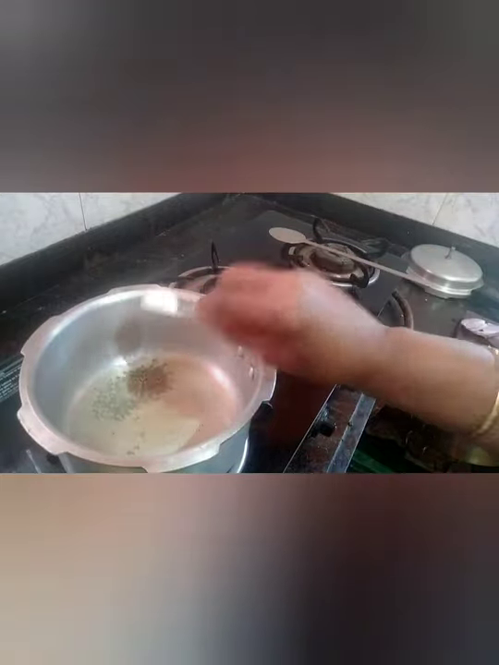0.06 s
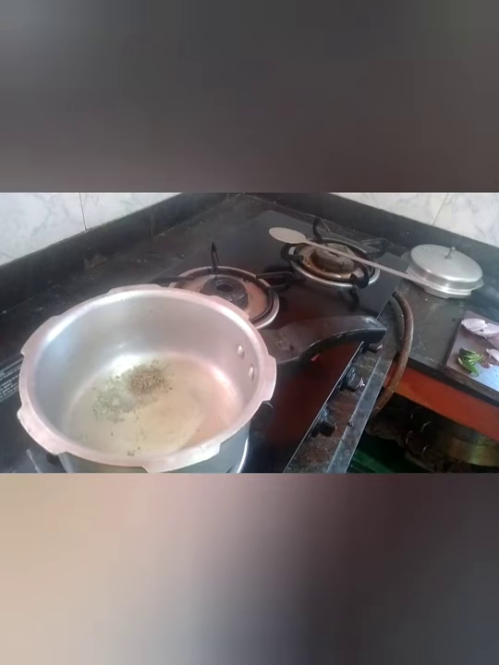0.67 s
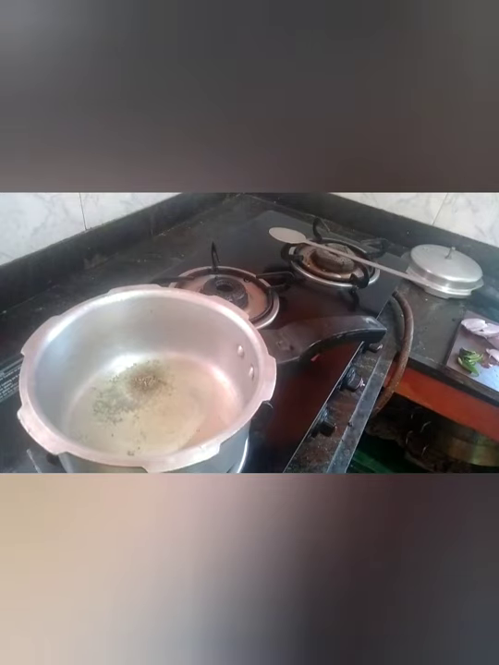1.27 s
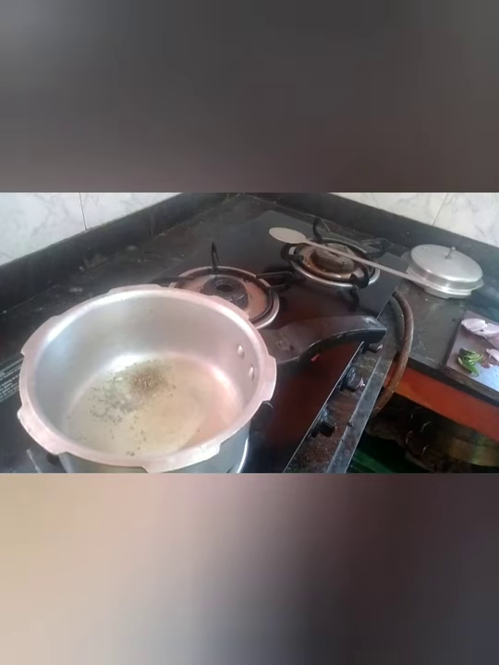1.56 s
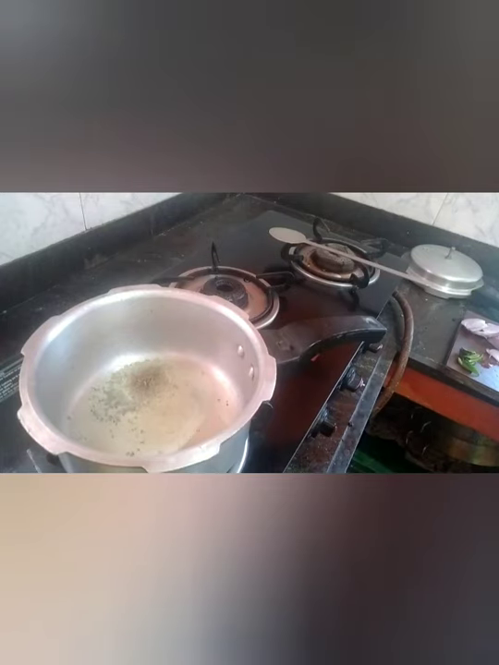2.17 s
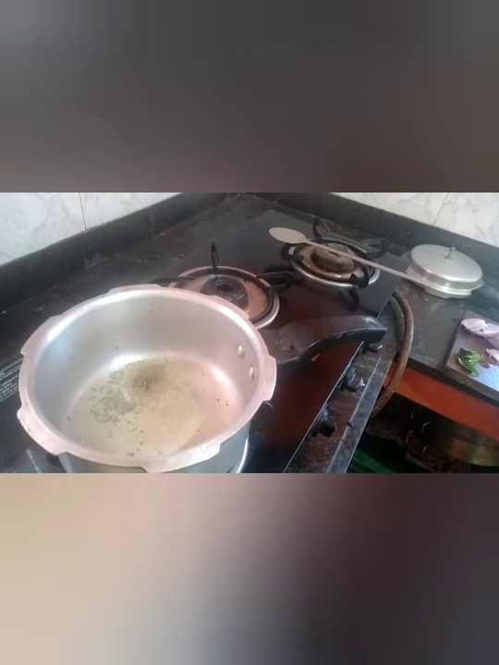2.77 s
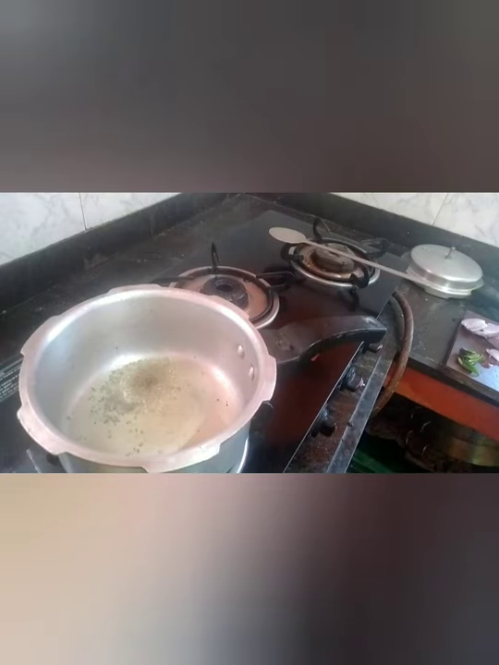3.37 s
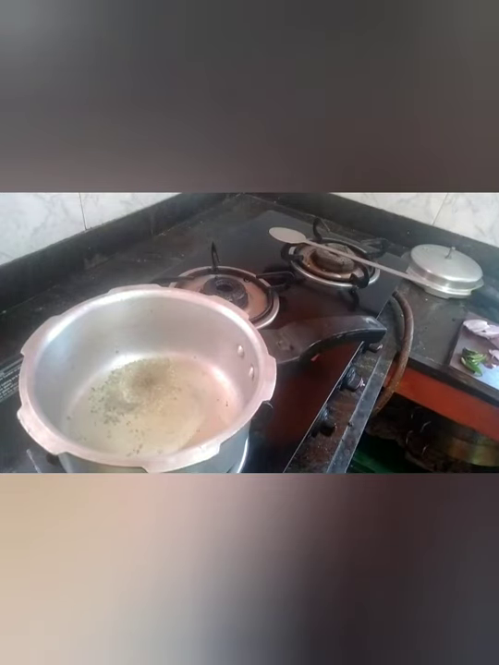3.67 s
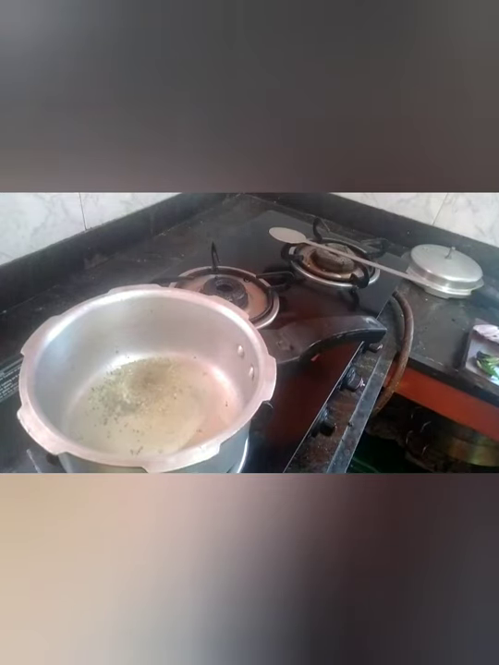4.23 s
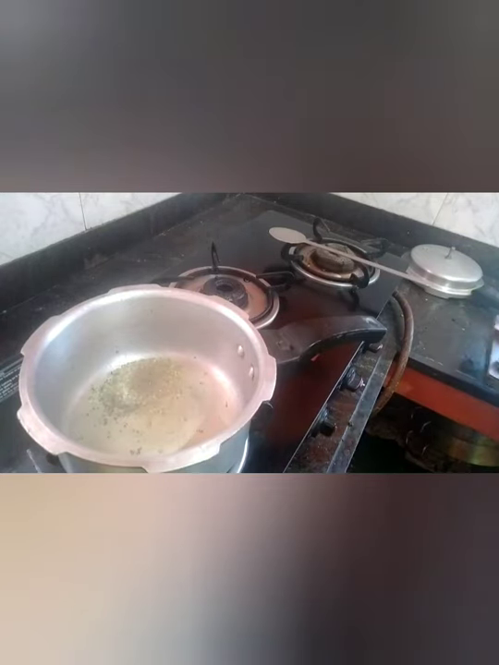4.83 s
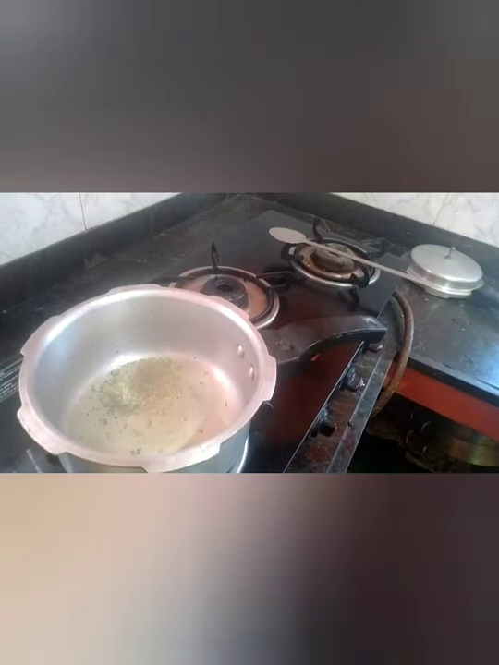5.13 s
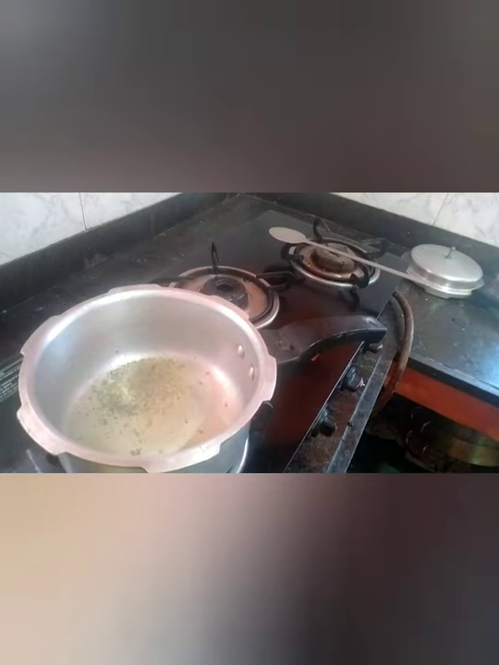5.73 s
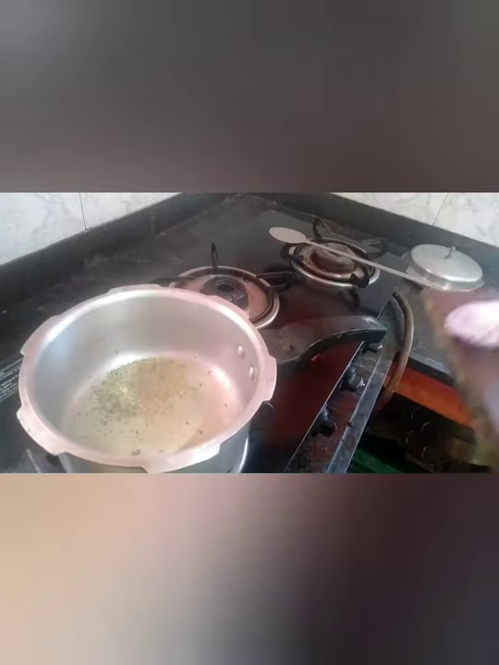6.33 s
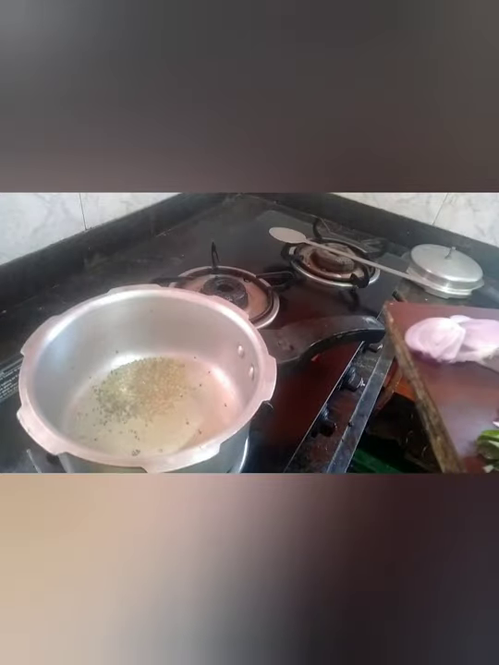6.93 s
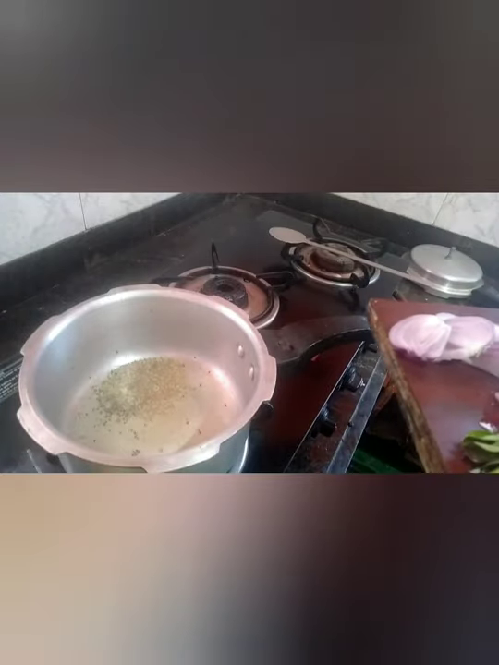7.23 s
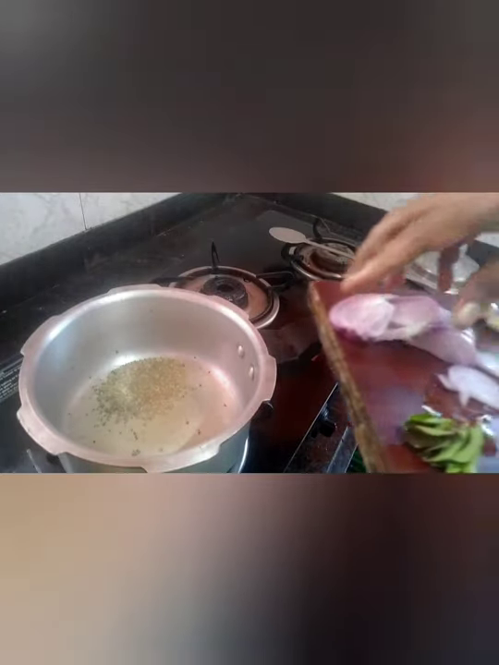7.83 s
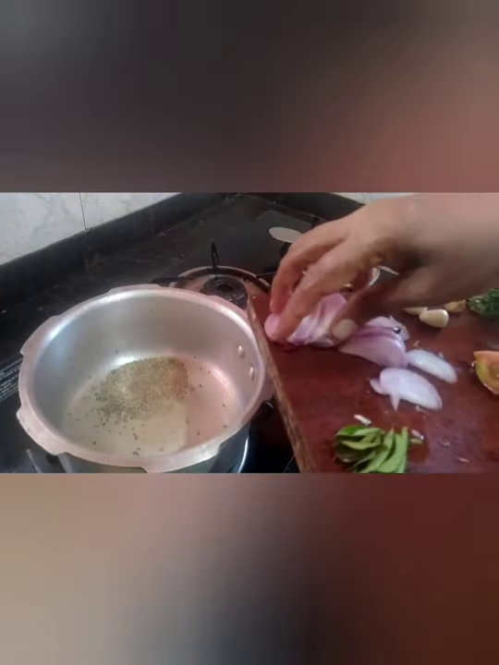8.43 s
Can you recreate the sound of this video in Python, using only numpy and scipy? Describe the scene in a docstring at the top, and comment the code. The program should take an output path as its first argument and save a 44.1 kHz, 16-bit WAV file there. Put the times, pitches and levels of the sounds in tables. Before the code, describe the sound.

Seeds pop in hot oil in an aluminium pot on a kitchen gas stove, heard close in stereo. Sharp, irregular cracks ring lightly on the metal and leave short hisses over a fine, steady sizzle, with small plinks and spits between. Two hollow plops come early on the right. The burner rumbles faintly with a low hum. In the second half, a cutting board slides softly over the counter, with three dull bumps on the left.

```python
"""A kitchen, at the gas stove, with a stereo microphone on an aluminium pot of seeds in hot oil.
Over a fine steady sizzle, each seed pops with a crack, a ringing steam bubble and a knock on the pot,
and leaves a hiss that dies away in the room. Big bubbles plink in between, small ones spit, and the oil
plops on the right. Behind it the burner rumbles, something hums, a cutting board is dragged over the
counter, and three dull bumps sound beside the left microphone."""
import sys
import numpy as np
from scipy import signal
from scipy.fft import rfft, irfft, next_fast_len
from scipy.io import wavfile
from scipy.ndimage import uniform_filter1d, map_coordinates

SR = 44100
rng = np.random.default_rng(int(sys.argv[2]) if len(sys.argv) > 2 else 0)


def master(y):
    """Save y as 16-bit WAV."""
    cut = np.clip(np.atleast_2d(y).T, -1, 1)
    pcm = np.round(cut * 32767)  # scale
    wavfile.write(sys.argv[1], SR, pcm.astype(np.int16))


N = 374693
POP_SIZE = 512  # samples in one short burst
POP_FREQS = np.fft.rfftfreq(POP_SIZE, 1 / SR)
PLINK_WIDTH_HZ = 740  # damping of a big bubble

# Seeds bursting. Each row: start in seconds, crack in dB, its treble tilt in dB per octave, steam bubble
# in dB, its pitch in Hz, knock in dB, after-hiss in dB, left minus right in dB.
SEED_POPS = [(0.031, -22, 9, -42, 4600, -47, -38.5, 3), (0.2439, -32, 7, -45, 4210, -43, -39, -3),
             (0.3159, -31, -4, -33.5, 4650, -46, -40, 3), (0.327, -22, 3, -31, 3600, -36.5, -34.5, 0),
             (0.3643, -14.5, 10, -39, 4300, -40, -48, 6), (0.3713, -19, -1, -48, 3470, -34.5, -25, -2),
             (0.5993, -31, 8, -41.5, 4310, -44.5, -35, 2), (0.6324, -24.5, -3, -34, 3840, -38.5, -30.5, 1),
             (0.7334, -22, 4, -30.5, 4230, -20, -29, -1), (0.941, -32, -2, -47, 3800, -42, -78, 5),
             (0.9807, -33, 0, -35, 3830, -41.5, -49, 5), (1.192, -34, -13, -36.5, 4160, -38, -47, 11),
             (1.266, -32, 8, -44, 4100, -50, -58, 1), (1.3767, -29, -8, -43, 4250, -56, -37, 3),
             (1.3858, -28, -16, -40, 4620, -51, -39, -7), (1.3948, -19.5, -4, -27, 4380, -37.5, -33, -6),
             (1.4647, -26, -17, -28.5, 4360, -44, -33, -5), (1.49, -16.5, -5, -28, 4060, -25, -23.5, -2),
             (1.5282, -15.5, -2, -30, 4090, -30.5, -26, 6), (1.6061, -26, -2, -36, 4450, -34.5, -30.5, 3),
             (1.63, -21.5, -7, -40, 4390, -43, -32, 1), (1.679, -23.5, 5, -39, 4000, -47, -42, 2),
             (1.7275, -21, 0, -30.5, 3940, -36.5, -32.5, -5), (1.9197, -24, -6, -34, 4060, -43, -45, -12),
             (1.933, -24, 4, -33.5, 4210, -51, -37, 6), (1.9762, -16.5, -10, -26, 4060, -35, -30.5, 0),
             (2.0291, -25.5, -5, -35, 4290, -42, -34, -1), (2.0425, -21, 5, -37, 4470, -44, -51, -5),
             (2.216, -23, 4, -31, 4120, -44.5, -39, -3), (2.3383, -23, 5, -41, 3780, -44.5, -40, -10),
             (2.4616, -20, 4, -44, 3400, -36, -34, 1), (2.5586, -25.5, -8, -44, 3750, -58, -41, -7),
             (2.5823, -22.5, 4, -27, 3970, -32, -32, 2), (2.6589, -21.5, 10, -31, 4080, -31.5, -32, -1),
             (2.6899, -26, 6, -35.5, 3840, -29.5, -33, 2), (2.7593, -19.5, 1, -34.5, 4200, -31.5, -33, 2),
             (2.848, -32, -3, -40, 3680, -61, -41.5, 4), (3.3137, -22, 7, -37, 3880, -32, -28.5, -3),
             (3.469, -25, 3, -40, 4230, -46, -33, 1), (3.6226, -25, 2, -47, 4540, -42, -40, -3),
             (3.6274, -19, -5, -30, 4300, -41, -31, -5), (3.7938, -22, 3, -37.5, 3910, -32, -30.5, 0),
             (3.8271, -23.5, 6, -40, 4160, -39.5, -40, -3), (3.893, -22, -16, -35, 3920, -40, -32, -6),
             (3.928, -18, 9, -35, 4360, -34, -27, 0), (4.026, -23, -16, -28.5, 4300, -40, -32.5, -3),
             (4.0608, -20, 9, -34, 3840, -44, -40, -4), (4.1159, -19, -2, -26.5, 4130, -33.5, -30, -6),
             (4.2846, -27, -26, -32.5, 4530, -47, -35.5, -5),
             (4.3723, -27, -12, -38.5, 4000, -44, -35.5, -6), (4.45, -20, -13, -27, 3520, -37.5, -32, 1.5),
             (4.5297, -23.5, 10, -37, 3900, -34, -37, -2), (4.5406, -23.5, 0, -30, 4260, -55, -33, -17),
             (4.6128, -28.5, -7, -39.5, 3440, -45, -43, -10), (4.661, -20.5, 5, -29, 4650, -57, -32, -6),
             (4.9128, -27, 0, -43, 4360, -51, -43, -7), (4.9831, -18, 7.5, -34.5, 4060, -51, -36, 2),
             (5.0184, -27.5, -6, -51, 5050, -51, -39.5, -2), (5.085, -30.5, -3, -40, 3980, -48, -41, -2),
             (5.1254, -20.5, -4, -30.5, 4030, -37, -32.5, -6),
             (5.2123, -21.5, 3, -32.5, 4100, -45, -30.5, -7), (5.3455, -20.5, 12, -39, 4120, -35, -30, 6),
             (5.4579, -28.5, 1, -35, 3320, -41, -43, 0), (5.5582, -22, -2, -25, 3850, -35.5, -28, -3),
             (5.656, -20, 3, -33, 4200, -39, -28, 3), (5.7442, -21, -11, -35, 4220, -43, -35, -1),
             (5.8039, -30.5, -3, -38, 4250, -52, -44, -1), (5.9007, -24.5, 2, -41.5, 4520, -41, -37.5, -3),
             (6.0242, -27, 2, -36.5, 4240, -41.5, -32.5, -3), (6.0768, -24, -6, -37, 4390, -46, -42, -3),
             (6.162, -20.5, 12, -37, 4240, -42, -29.5, 2), (6.2043, -26.5, 0, -38, 3800, -48, -40, 4),
             (6.727, -20, 7, -30, 4440, -41.5, -31, -1), (6.9259, -19.5, 0, -52, 4020, -36, -28, 1),
             (6.9735, -16.5, 8, -25.5, 4400, -40, -41, -12), (6.9842, -23, 3, -29, 4450, -40, -30, -9),
             (7.0579, -29, -6, -31, 4470, -42.5, -36, 0), (7.33, -26.5, 5, -41, 3720, -62, -38, -6),
             (7.5402, -22.5, 13, -31.5, 4360, -41, -32, 1), (7.5573, -22, -6, -28.5, 3560, -32.5, -31, 5),
             (7.628, -22, -1, -32.5, 4200, -35, -34.5, 1), (7.6641, -21, -4, -36, 3930, -48, -39.5, -4),
             (7.7279, -24, 14, -45, 4470, -38, -39.5, -8), (7.851, -27.5, -3, -64, 4830, -59, -54, -8),
             (7.967, -23, 2, -34, 3660, -28.5, -30.5, 16), (7.9748, -21.5, 1, -41, 3770, -52, -42, -10),
             (8.0451, -20, 14, -29, 4500, -41.5, -33, -3), (8.1202, -25.5, -11, -35, 4470, -42, -35, -9),
             (8.265, -23, -6, -33.5, 4600, -43.5, -37.5, -10),
             (8.4579, -21.5, 9, -36.5, 3900, -32.5, -38.5, -12)]
# Big steam bubbles. Each row: start in seconds, level in dB, pitch in Hz, after-hiss in dB.
BIG_BUBBLES = [(0.2288, -33.5, 4180, -36), (2.1447, -32, 4400, -49), (2.2075, -35, 4330, -39),
               (3.2882, -28, 4330, -41), (3.5057, -28, 4200, -39), (4.1472, -30, 4170, -32.5),
               (4.7684, -22, 4300, -34), (5.944, -26.5, 4300, -34), (6.3575, -33.5, 4970, -41),
               (7.0758, -28.5, 4250, -48), (7.121, -32, 4100, -46), (7.913, -36, 4700, -46),
               (8.1995, -29, 4340, -49)]


def amp(db):
    """Decibels to gain."""
    return 10 ** (np.asarray(db) / 20)


def panned(db):
    """Left and right gains, the left one higher by db."""
    return amp(db * np.array([[1], [-1]]) / 2)


def unit(x):
    """x at rms 1."""
    return x / np.sqrt(np.mean(x ** 2) + 1e-20)


def along(points, hz):
    """(Hz, value) points read on a log axis."""
    f, v = np.transpose(points)
    return np.interp(np.log(hz + 1), np.log(f + 1), v)


def wobble(rate):
    """A smooth random curve, rate knots a second."""
    return map_coordinates(rng.standard_normal(int(N * rate / SR) + 4), [np.arange(N) * rate / SR])


def filtered(x, response):
    """x through a response given as a function of frequency."""
    m = next_fast_len(N + SR // 2)
    return irfft(rfft(x, m) * response(np.fft.rfftfreq(m, 1 / SR)), m)[..., :N]


def resonance(f, hz, width):
    """Causal response of one mode."""
    return 1j * f * width / (hz * hz - f * f + 1j * f * width)


def causal(gain):
    """The minimum-phase response that has this gain."""
    cepstrum = irfft(np.log(gain))
    half = len(cepstrum) // 2
    return np.exp(rfft(cepstrum * np.r_[1, np.full(half - 1, 2), 1, np.zeros(half - 1)]))


def add(track, s, sound):
    """Mix a short sound into the track at s seconds."""
    part = track[:, max(round(s * SR), 0):][:, :sound.shape[-1]]
    part += sound[..., :part.shape[1]]


def rush(spectrum, grain_db=0, patchy_db=0):
    """Stereo noise of rms 1; grain_db roughens it in time, patchy_db lets narrow bands swell and fade."""
    # How alike the two microphones hear it. Each row: frequency in Hz, likeness from 0 to 1.
    likeness = [(30, 0), (100, 0.8), (400, 0.24), (2000, 0), (9000, 0.02)]
    bands = signal.stft(rng.standard_normal((2, N)), nperseg=512)[2]
    patches = uniform_filter1d(rng.standard_normal(bands.shape[1:]), size=3, axis=0)
    patches = uniform_filter1d(patches, size=14, axis=1)
    noise = signal.istft(bands * amp(patchy_db * unit(patches)), nperseg=512)[1][:, :N]
    noise *= amp(grain_db * wobble(1500))

    def mid_side_gains(hz):
        angle = np.arccos(np.clip(along(likeness, hz), -1, 1)) / 2
        return amp(along(spectrum, hz)) * [np.cos(angle), np.sin(angle)]

    mid, side = filtered(noise, mid_side_gains)
    return unit(np.array([mid + side, mid - side]))


def mic_paths(wall_db, wall_t60, pan_scatter_db=2, left_lag_samples=9):
    """Response from a burst to the microphones: direct, the right one first, then off the pot wall."""
    t = np.arange(POP_SIZE) / SR
    echoes = rng.standard_normal((2, POP_SIZE)) * amp(-60 * t / wall_t60)
    echoes *= amp(wall_db) / np.linalg.norm(echoes, axis=1, keepdims=True)
    echoes[:, 0] += 1  # the direct sound
    echoes[0] = np.roll(echoes[0], left_lag_samples)
    return rfft(echoes * panned(pan_scatter_db * rng.standard_normal()))


def burst(response, db):
    """A short stereo sound whose energy, taken over 3 ms, has level db."""
    sound = irfft(response)
    power = np.sum(sound ** 2) / 2 / (.003 * SR)
    return amp(db) * sound / np.sqrt(power)


def burst_rows(seed_width_hz=1380, plink_crack_db=-1, plink_knock_db=-18):
    """Seeds and big bubbles in the columns of SEED_POPS, with the bubble's width in Hz after its pitch."""
    seeds = [(s, crack, tilt, bubble, hz, seed_width_hz, knock, hiss, pan)
             for s, crack, tilt, bubble, hz, knock, hiss, pan in SEED_POPS]
    plinks = [(s, db + plink_crack_db, 0, db, hz, PLINK_WIDTH_HZ, db + plink_knock_db, hiss, 0)
              for s, db, hz, hiss in BIG_BUBBLES]
    return np.array(seeds + plinks)


def stove(flutter_db=2.0, waver_rad=0.79, flame_db=-56.5, flame_rise_db=0.5):
    """The gas flame rumbles behind a rough hum whose lower line swells and fades in smooth arches."""
    # The hum's two lines. Each row: frequency in Hz, resting level in dB.
    hum_lines = [(106, -78), (226, -74)]
    # Swells of the lower line. Each row: peak in seconds, length in seconds, added part in dB re rest.
    swells = [(1.456, 1.7, 7), (5.366, 1.74, 14), (7.76, 0.36, 10)]
    # The flame's spectrum. Each row: frequency in Hz, relative level in dB.
    flame_spectrum = [(25, -40), (45, -31), (62, -1), (110, -8.5), (160, -5.5), (380, 0.5), (520, -0.5),
                      (800, -1.5), (1200, -7), (2500, -8), (6000, -25)]
    t = np.arange(N) / SR
    low, high = [amp(db + flutter_db * wobble(25)) * np.sqrt(2)
                 * np.sin(2 * np.pi * hz * t + waver_rad * wobble(26)) for hz, db in hum_lines]
    swell = 1 + sum(amp(db) * np.cos(np.pi * np.clip((t - s) / length, -.5, .5)) ** 2
                    for s, length, db in swells)
    flame = amp(flame_db + flame_rise_db * np.linspace(-.5, .5, N)) * rush(flame_spectrum, patchy_db=2.5)
    return swell * low + high + flame


def cutting_board(push_db_per_s=199):
    """Wood rubs over the counter in a soft, uneven rush: each slide starts with a push and slows to rest."""
    # The slides. Each row: peak in seconds, level there in dB, slowing in dB per second.
    slides = [(0, -56.5, 9), (3.9, -57.5, 15), (4.95, -59.5, 30), (5.331, -40.5, 43), (7.25, -48.5, 48),
              (7.8, -50.5, 99)]
    # Wood on the counter. Each row: frequency in Hz, relative level in dB.
    rub_spectrum = [(45, -22), (100, -4), (145, -8), (190, 0.5), (245, -9), (340, 0), (550, -6), (850, -3),
                    (1600, -4.5), (2600, -5.5), (5000, -18.5)]
    t = np.arange(N) / SR
    speed = sum(amp(db - np.maximum(push_db_per_s * (s - t), slowing * (t - s)))
                for s, db, slowing in slides)
    rub = amp(1.4 * wobble(40)) * rush(rub_spectrum, grain_db=1.5, patchy_db=2)
    return speed * rub


def thump(hz, width, pan_db):
    """One well-damped mode, softly struck, heard mostly on one side."""
    f = np.fft.rfftfreq(4 * POP_SIZE, 1 / SR)
    push = irfft(resonance(f, hz, width) / (1 + 1j * f / (3 * hz)) ** 2)
    return panned(pan_db) * push / np.abs(push).max()


def plops_and_bumps(plop_pan_db=-14.5, thud_db=-9):
    """Hollow plops from the pot on the right, each over a low thud; dull bumps by the left microphone."""
    # Deep plops in the oil. Each row: start in seconds, level in dB, extra thud in dB.
    plops = [(0.3627, -20, 2), (0.3709, -40, -3), (0.733, -28.5, -3.5), (2.6895, -39, -4)]
    # What every plop rings with. Each row: frequency in Hz, width in Hz, relative level in dB.
    plop_modes = [(513, 150, 0), (734, 330, -2.5), (1290, 680, -13)]
    # The bumps. Each row: start in seconds, level in dB, pitch in Hz.
    bumps = [(5.344, -53, 120), (5.655, -41.5, 170), (7.329, -45, 130)]
    out = np.zeros((2, N))
    plop = sum(amp(db) * thump(hz, width, plop_pan_db) for hz, width, db in plop_modes)
    thud = amp(thud_db) * thump(hz=150, width=170, pan_db=plop_pan_db)
    for s, db, extra_db in plops:
        add(out, s, amp(db) * (plop + amp(extra_db) * thud))
    for s, db, hz in bumps:
        add(out, s, amp(db) * thump(hz, width=260, pan_db=27.5))
    return out


def tick(pitch, db):
    """One tiny bubble; pitch runs from 0 (large) to 1 (small)."""
    hz = 3600 * 3.3 ** pitch
    return burst(mic_paths(wall_db=9, wall_t60=0.02) * resonance(POP_FREQS, hz, hz / 3) ** 2, db)


def sizzle(bed_db=-47, start_db=-6.5, fill_s=0.62, warming_db=1, tick_db=-58, tick_count=260):
    """Countless tiny bubbles make a hiss that starts thin and grows as the oil heats, with faint ticks."""
    # The fizz of the oil. Each row: frequency in Hz, relative level in dB.
    fizz_spectrum = [(600, -5), (1300, -26), (2100, -20), (2800, -10), (3400, -2.5), (4100, 3.5),
                     (4700, 2.5), (4850, -7), (5400, -1), (7000, 2), (8500, 8.5), (9800, 7), (11000, 3.5),
                     (14000, 1)]
    fizz = rush(fizz_spectrum, grain_db=2, patchy_db=1.5)
    thin_start = start_db * np.exp(-np.arange(N) / SR / fill_s)
    warming = warming_db * np.linspace(-.5, .5, N)
    bed = amp(bed_db + thin_start + warming + 0.26 * wobble(3.0)) * fizz
    ticks = np.zeros((2, N))
    for when, size, pitch in rng.random((tick_count, 3)):
        add(ticks, when * N / SR, tick(pitch, tick_db + 7 * size ** 3))
    return bed + ticks


def dying(levels, t60, rise_s=0.0019, slow_rise_db=-32.5):
    """An envelope that rises at every burst, half as fast at slow_rise_db, and dies away; energies add."""
    energy, t = np.zeros((1, N)), np.arange(SR // 4) / SR
    for s, db in zip(burst_rows()[:, 0], levels):
        rise = np.exp(-t / (rise_s * (1 + amp(db - slow_rise_db) ** 2)))
        add(energy, s, amp(db) ** 2 * rise / rise.sum())
    kept_per_sample = amp(-60 / (t60 * SR)) ** 2
    return np.sqrt(np.abs(signal.lfilter([1], [1, -kept_per_sample], energy[0])))


def after_hiss(linger_db=-17, bubble_cap_db=-26, knock_cap_db=-37.5):
    """After each burst the kitchen rings on in a hiss that dies away, while bubble and knock linger in pot and
    kitchen."""
    # Spectra of the lingering hiss, the lingering bubble and the lingering knock. # Each row: frequency in Hz,
    # relative level in dB.
    tail_spectrum = [(300, -31), (700, -13.5), (1300, -22.5), (2500, -17), (3200, -14.5), (4200, -8),
                     (5400, -9), (7000, -3.5), (9300, 1.5), (11000, -3.5), (12500, -3), (14000, -13.5)]
    bubble_spectrum = [(1800, -52), (2700, 2.5), (3200, 1.5), (3600, 4), (4100, 8.5), (4700, 5),
                       (4900, -12), (5300, 10), (7000, -38)]
    knock_spectrum = [(250, -76), (480, 2), (780, -3), (1200, -15), (1700, 2), (2100, -5), (3200, -18)]
    _, _, _, bubble, _, _, knock, hiss, _ = burst_rows().T
    tail = dying(hiss, t60=.4) * rush(tail_spectrum, grain_db=1.5, patchy_db=2)
    bright = rush(bubble_spectrum, grain_db=1.5, patchy_db=5)
    hollow = rush(knock_spectrum, patchy_db=4.5)
    # the biggest bubbles and the hardest knocks ring no more than middling ones
    ring = dying(np.minimum(bubble, bubble_cap_db) + linger_db, t60=0.58) * bright
    body = dying(np.minimum(knock, knock_cap_db) + linger_db, t60=0.83) * hollow
    return tail + ring + body


def wall_ring(below_hiss_db=18, pitch_spread=.02):
    """Each burst strikes another spot of the metal wall, which rings with a new choice of its modes."""
    # Close groups of wall modes. Each row: centre in Hz, relative level in dB, t60 in seconds.
    mode_groups = [(1047, -9, 0.62), (1192, -12, .5), (1590, -4.5, .3), (2454, -9, 0.59), (2640, -4, 0.12),
                   (3070, -2, 0.33), (3330, 1, .35), (3580, -4, 0.33), (4050, 4.5, 0.45), (4260, -7, 0.37),
                   (4490, -8, 0.33), (4730, 1.5, 0.5), (5080, -8, 0.43), (6000, 2.5, .3)]
    out, t = np.zeros((2, N)), np.arange(SR // 4) / SR
    hz, db, t60 = np.transpose(mode_groups)[:, :, None]
    decay = amp(db - 60 * t / t60)
    for s, *_, hiss, _ in burst_rows():
        modes = decay * np.sin(2 * np.pi * hz * (1 + pitch_spread * rng.standard_normal(hz.shape)) * t)
        weights = rng.uniform(-0.99, 1, (2, len(modes)))
        add(out, s, amp(hiss - below_hiss_db) * weights @ modes)
    return out


def spits(centre_hz=8900, width_hz=14000, pitch_spread=0.16):
    """Lone bubbles snap, short and dry, without knocking the pot."""
    # The lone bubbles. Each row: start in seconds, level in dB.
    lone_bubbles = [(0.1817, -51), (0.565, -37), (0.577, -34), (1.8165, -30), (2.3003, -32), (2.4292, -36),
                    (2.5456, -33), (2.884, -35), (3.72, -34.5), (4.2, -34), (4.397, -41), (4.509, -43),
                    (4.783, -30), (5.1475, -31), (5.1906, -35), (5.5633, -23), (5.6455, -35), (5.8806, -40),
                    (5.9741, -35), (6.047, -31), (6.3481, -30.5), (6.7183, -27), (6.932, -30), (7.348, -34),
                    (7.6402, -29), (7.7201, -28), (8.1248, -26.5)]
    out = np.zeros((2, N))
    for s, db in lone_bubbles:
        hz = centre_hz * np.exp(pitch_spread * rng.standard_normal())
        snap = resonance(POP_FREQS, hz, width_hz) ** 2
        add(out, s, burst(mic_paths(wall_db=-2, wall_t60=.017) * snap, db))
    return out


def spatter(split_db=-12, lead_s=0.0022, lead_spread=0.41, drop_db=-27.5, spread_db=6, flight_s=.05):
    """Each husk splits with a tick just before it bursts; a drop flung up falls back and spits."""
    out = np.zeros((2, N))
    for s, crack, *_ in SEED_POPS:
        flight, size, drop_pitch, lead, split_pitch = rng.random(5)
        split_at = s - lead_s * (1 + lead_spread * (2 * lead - 1))
        add(out, split_at, tick(split_pitch, crack + split_db))
        add(out, s + flight_s * flight, tick(drop_pitch, crack + drop_db + spread_db * size ** 2))
    return out


def bubble_breakup(count=3, breakup_s=0.0037, pitch_spread=0.29, fragment_db=-10):
    """Each big bubble breaks into smaller ones of scattered pitch, which roughen its plink."""
    out = np.zeros((2, N))
    for s, db, hz, _ in BIG_BUBBLES:
        for delay, pitch in rng.random((count, 2)):
            ring = resonance(POP_FREQS, hz * (1 + pitch_spread * (pitch - .5)), PLINK_WIDTH_HZ) ** 2
            path = mic_paths(wall_db=-2, wall_t60=0.11)
            add(out, s + breakup_s * delay, burst(path * ring, db + fragment_db))
    return out


def pops(crack_hz=9000, knock_pan_db=-4, hardest_knock_db=-27, echo_s=.0102, echo_db=-21.5):
    """A husk or big bubble cracks, the steam bubble rings at its own pitch, the recoil knocks the pot."""
    # The crack's spectrum. Each row: frequency in Hz, relative level in dB.
    crack_spectrum = [(500, -32), (1500, -3), (2600, -10), (5400, -6), (7000, 8.5), (9000, 7.5),
                      (11000, 6.5), (14000, 8.5)]
    # The pot's answer to a knock. Each row: frequency in Hz, width in Hz, relative level in dB.
    pot_modes = [(534, 58, 0), (863, 100, 2.5), (1130, 77, -23), (1610, 350, 7)]
    out, f = np.zeros((2, N)), POP_FREQS
    octaves = np.log2(np.clip(f, 6000, 14000) / 9000)
    for s, crack_db, tilt, bubble_db, bubble_hz, bubble_width, knock_db, _, pan in burst_rows():
        path = mic_paths(wall_db=-2, wall_t60=0.019) * panned(pan)
        knock_path = mic_paths(wall_db=-8, wall_t60=.012, pan_scatter_db=4) * panned(knock_pan_db)
        crack_pitch, pot_pitch = np.exp(rng.standard_normal(2) * [.05, .08])
        colour = causal(amp(along(crack_spectrum, f) + tilt * octaves))
        crack = colour * (0.16 + resonance(f, crack_hz * crack_pitch, 3200))
        bubble = resonance(f, bubble_hz, bubble_width) * resonance(f, bubble_hz, 6000)
        dry_push = 2.0 * resonance(f, 1070, 1770) ** 2
        knock = dry_push + sum(amp(db) * resonance(f, hz * pot_pitch, width) for hz, width, db in pot_modes)
        add(out, s, burst(path * crack, crack_db) + burst(path * bubble, bubble_db))
        add(out, s, burst(knock_path * knock, min(knock_db, hardest_knock_db)))
    # the nearest kitchen surface throws each pop back
    return filtered(out, lambda hz: 1 + amp(echo_db) * np.exp(-2j * np.pi * hz * echo_s))


def pot_colour(f):
    """The pot's broad hollow resonances, and the bands that it swallows."""
    # Resonances, then bands that cancel in the pot. Each row: frequency in Hz, width in Hz, gain in dB.
    cavity_modes = [(800, 190, -9), (1640, 140, -8), (2465, 200, 1), (3060, 130, 0), (3300, 110, -3),
                    (4180, 400, -12), (4680, 170, -7)]
    dips = [(4870, 190, -3), (5400, 290, -4)]
    hollow = 1 + sum(amp(db) * resonance(f, hz, width) for hz, width, db in cavity_modes)
    notches = [1 - (1 - amp(db)) * resonance(f, hz, width) for hz, width, db in dips]
    return hollow * np.prod(notches, axis=0)


def scene():
    """Pot and kitchen as heard from the microphone position."""
    # The two microphones differ in colour. Each row: frequency in Hz, left minus right in dB.
    mic_balance = [(60, 10), (330, 14.5), (500, 1.5), (770, -2), (1200, 0), (4200, -1), (6400, -2.5),
                   (8200, -4.5), (9700, 3), (14000, 1)]
    frying = pops() + bubble_breakup() + spatter() + spits() + wall_ring() + after_hiss() + sizzle()
    kitchen = filtered(frying, pot_colour) + stove() + cutting_board()
    return filtered(kitchen, lambda hz: panned(along(mic_balance, hz))) + plops_and_bumps()


def record(dry):
    """The recorder rounds the sharpest peaks and keeps nothing above its band limit."""
    ceiling, top_hz = .75, 14450
    rounded = dry / (1 + np.abs(dry / ceiling) ** 4) ** (1 / 4)
    return filtered(rounded, lambda hz: 1 / np.sqrt(1 + (hz / top_hz) ** 130))


dry = scene()
out = record(dry)
master(out)
```